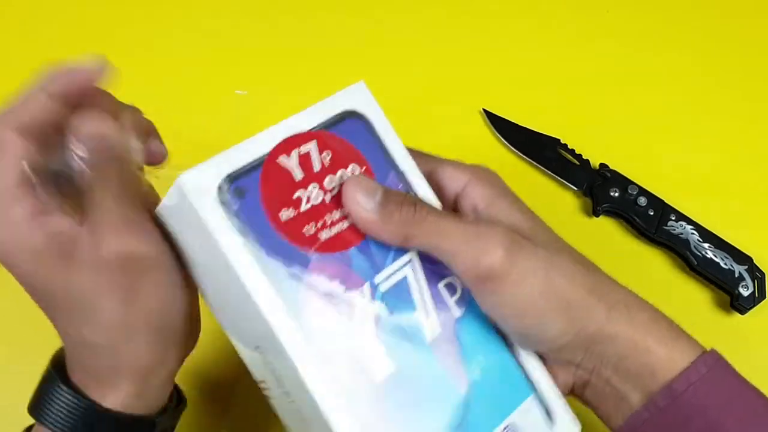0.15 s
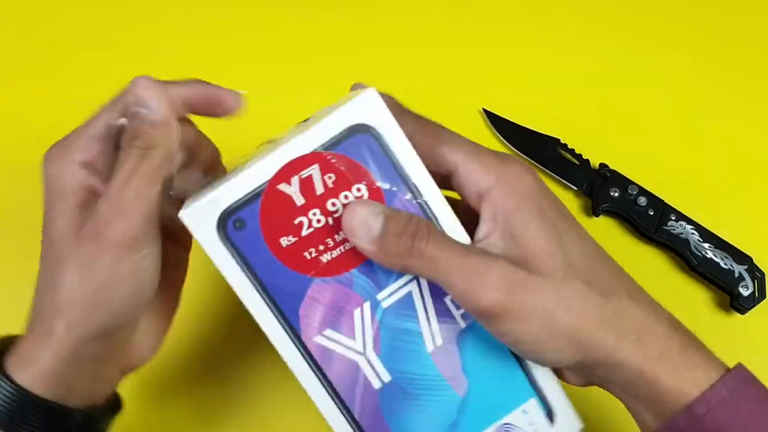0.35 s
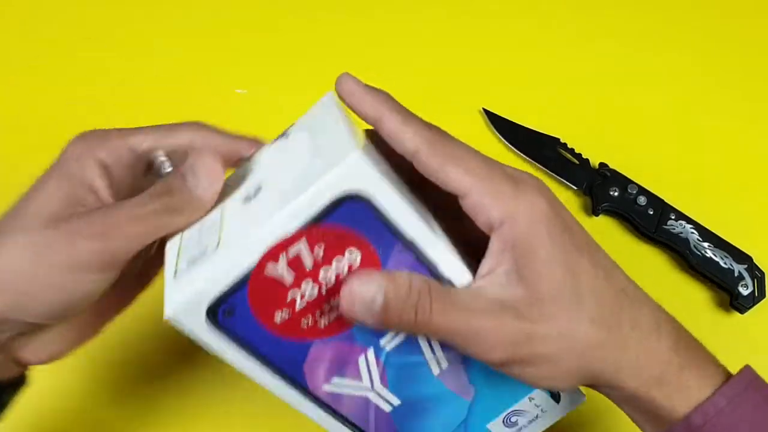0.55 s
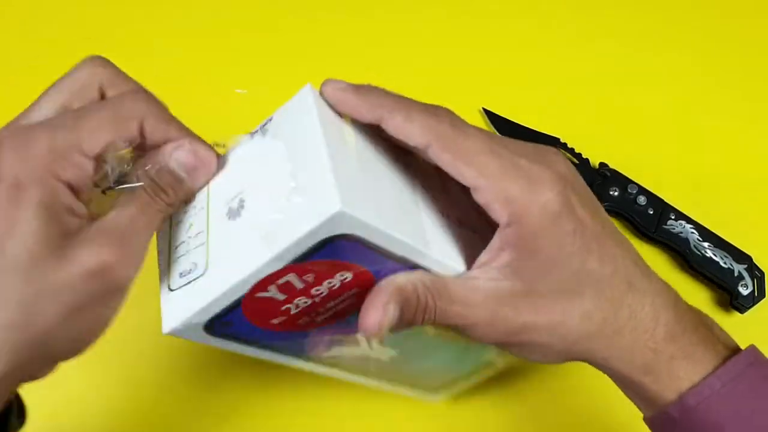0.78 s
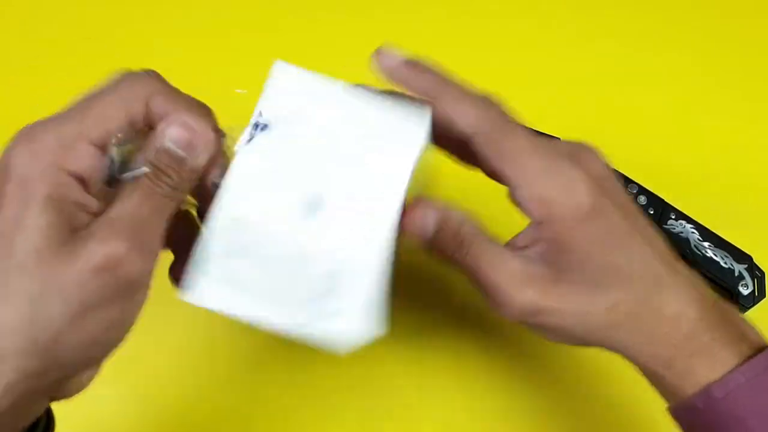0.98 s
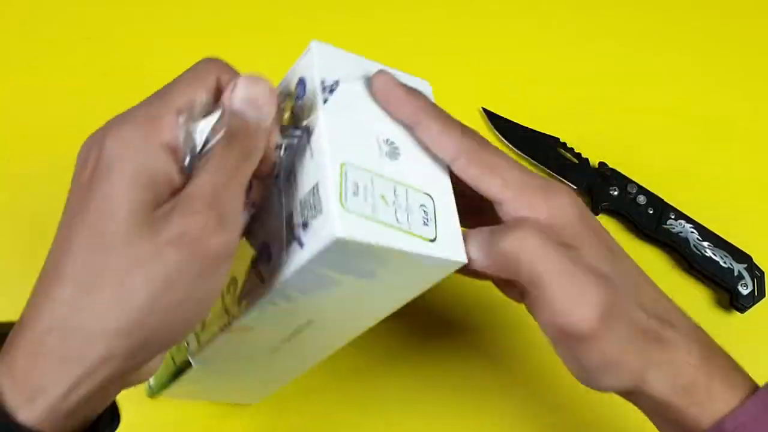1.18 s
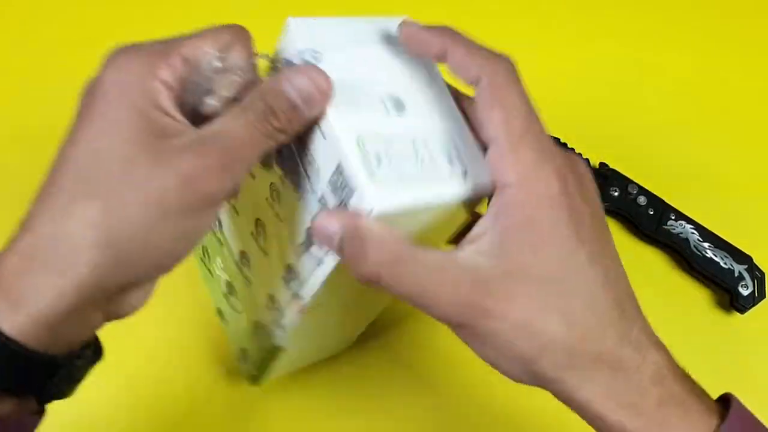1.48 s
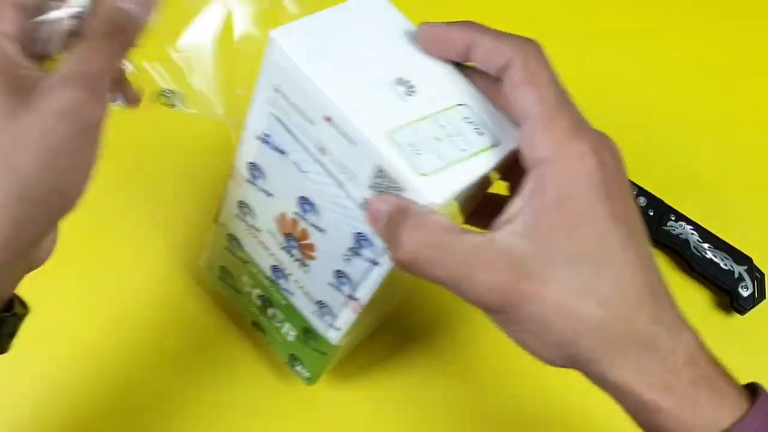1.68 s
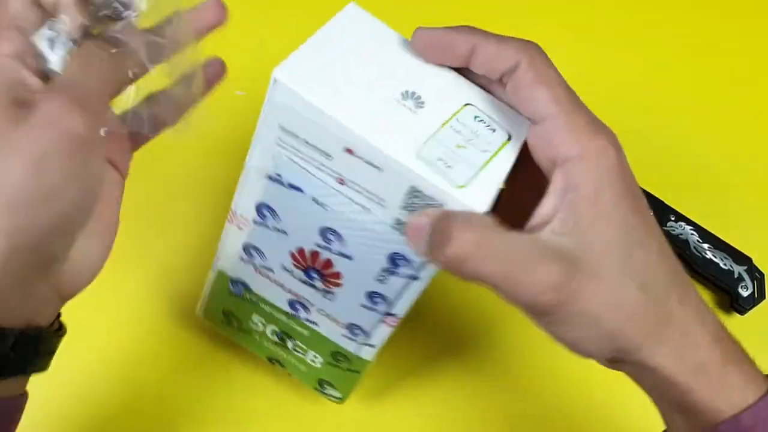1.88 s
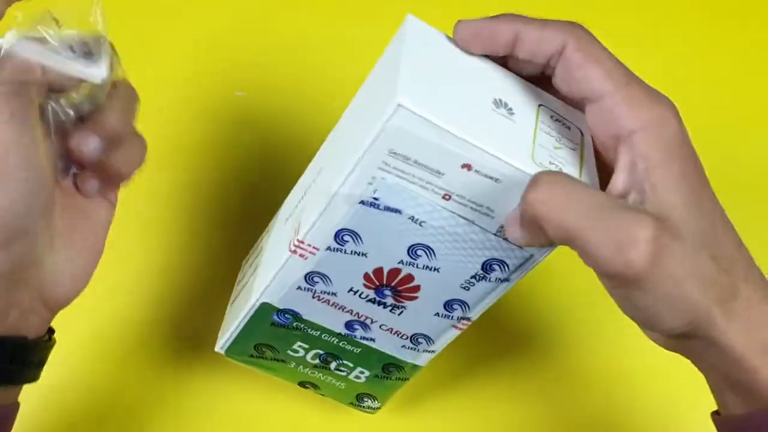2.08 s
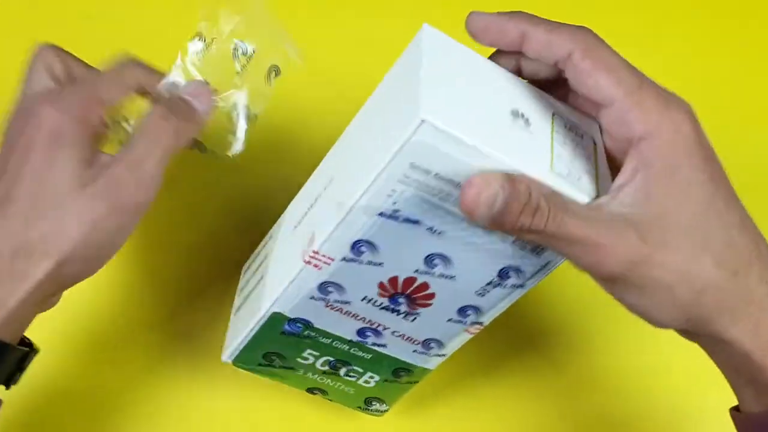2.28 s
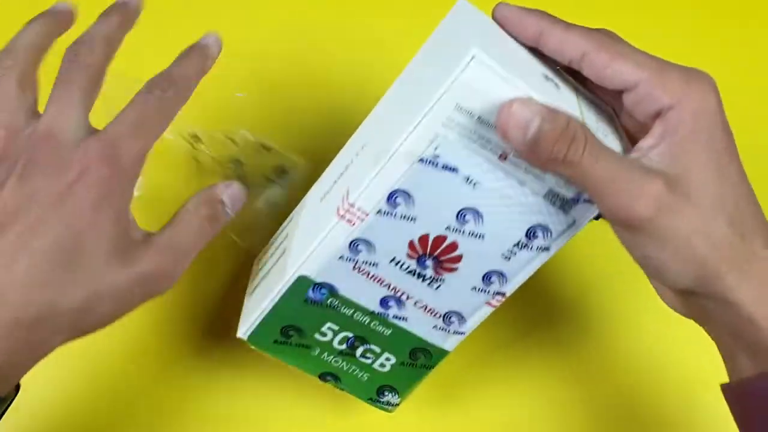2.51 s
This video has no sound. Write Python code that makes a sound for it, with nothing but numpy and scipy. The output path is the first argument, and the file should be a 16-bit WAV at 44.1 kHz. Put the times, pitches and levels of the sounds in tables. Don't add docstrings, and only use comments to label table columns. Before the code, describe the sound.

Thin plastic film crinkles and snaps as hands tear it off a cardboard box indoors

```python
import sys
import numpy as np
from scipy import signal
from scipy.fft import rfft, irfft
from scipy.io import wavfile

SR = 44100
rng = np.random.default_rng(int(sys.argv[2]) if len(sys.argv) > 2 else 0)


def amplitude_ratio(level_db):
    exponent = np.asarray(level_db, float) / 20
    return 10 ** exponent


def wav_record(signal):
    frames = np.transpose(np.atleast_2d(signal))
    bounded = np.clip(frames, -1, 1)
    quanta = np.round(bounded * 32767).astype(np.int16)
    wavfile.write(sys.argv[1], SR, quanta)


N = 116865

# time_s, crackle_db
HANDLING = [(0, -50), (0.173, -71), (.195, -47.5), (.47, -38.5), (.53, -46), (.65, -49), (.93, -40.5),
            (1.06, -44.5), (1.28, -42), (1.5, -45), (1.621, -50.5), (1.69, -31.5), (2.05, -39),
            (2.299, -31), (2.45, -39), (2.65, -46)]
# pitch_hz, level_db (per Hz)
FILM = [(70, -20.5), (300, -7.5), (1000, -14), (1600, -5), (2200, -4), (4300, -1.4), (8000, -1.5),
        (12000, -4.5), (16500, -24)]


def evened(x):
    return x / np.sqrt(np.mean(x ** 2) + 1e-20)


def read(points, hz):
    table_hz, value = np.transpose(points)
    return np.interp(np.log(hz + 1), np.log(table_hz + 1), value)


def add(mix, start_s, sound):
    part = mix[round(start_s * SR):][:len(sound)]
    part += sound[:len(part)]


def causal(points):
    log_gain = np.log(amplitude_ratio(read(points, abs(np.fft.fftfreq(2048, 1 / SR)))))
    return np.fft.ifft(np.exp(np.conj(signal.hilbert(log_gain)))).real[:512]


def band(x, edge_hz, kind):
    return signal.sosfilt(signal.butter(2, edge_hz, kind, fs=SR, output="sos"), x)


def handling_db():
    time_s, level_db = np.transpose(HANDLING)
    return np.interp(np.arange(N) / SR, time_s, level_db)


def air():
    # pitch_hz, level_db (per Hz)
    air_colour = [(30, 5.5), (100, 5.5), (600, 2), (4000, -9), (10000, -19.5), (16500, -35)]
    air_db, rub_share = -50, 0.33
    spectrum = rfft(rng.standard_normal(N)) * amplitude_ratio(read(air_colour, np.fft.rfftfreq(N, 1 / SR)))
    rub_db = rub_share * (handling_db() - np.transpose(HANDLING)[1].mean())
    return amplitude_ratio(air_db + rub_db) * evened(irfft(spectrum, N))


def snap(level_db, hz, treble_db, chance, film):
    splits_per_s, ring_cycles, treble_run_s = 17000, 1.05, .0025
    treble_hz, film_low_hz = 7500, 450
    t = np.arange(chance.shape[1]) / SR
    run_s = .0012 * (.5 + chance[0, 0])
    first = 1.1 * chance[0, 1]
    place = chance[0, 2]

    splits = (chance[0] < splits_per_s / SR) * (2 * chance[1] - 1)
    splits = splits * np.exp(-(t / run_s - .5) ** 2)
    splits = splits + first * (t == 0) * np.sign(chance[1, 0] - .5)

    ringing = np.exp(-t * hz / ring_cycles) * np.sin(2 * np.pi * hz * t)
    ring = band(np.convolve(splits, ringing)[:len(t)], .5 * hz, "high")
    body = band(np.convolve(splits, film)[:len(t)], treble_hz, "low")
    body = band(body, film_low_hz, "high")
    treble = band(splits * np.exp(-t / treble_run_s), treble_hz, "high")
    treble = band(treble, 1.2 * treble_hz, "low")
    mix = amplitude_ratio(-6) * evened(ring) + amplitude_ratio(0.5) * evened(body)
    mix = mix + amplitude_ratio(-0.26 + treble_db) * evened(treble)

    echo_s, echo_db, echo_spread = .00095, -7, .2
    lag = round(echo_s * (1 + echo_spread * (place - .5)) * SR)
    mix = mix + amplitude_ratio(echo_db) * band(np.pad(mix, (lag, 0))[:len(t)], treble_hz, "low")
    return amplitude_ratio(level_db - 1.5) * mix * np.sqrt(.0025 / t[-1])


def crackle():
    crackles_per_s, size_spread_db, crackle_db = 1100, 3, -3
    hit, size, patch = rng.random((N, 3)).T
    size = amplitude_ratio(size_spread_db * np.minimum(-np.log(size + 1e-9), 3))
    size = size * (hit < crackles_per_s / SR)
    pitches = np.geomspace(1200, 8000, 30)
    patch = (patch * len(pitches)).astype(int)
    out, film = np.zeros(N), causal(FILM)
    for k, (hz, chance) in enumerate(zip(pitches, rng.random((len(pitches), 2, 512)))):
        out += signal.oaconvolve(size * (patch == k), snap(0, hz, -5, chance, film))[:N]
    return amplitude_ratio(handling_db() + crackle_db) * evened(out)


def snaps():
    # start_s, level_db, ring_hz, treble_db
    clear_snaps = [(0.0153, -44.5, 5900, -1), (0.057, -35.5, 1510, -2), (0.1363, -34, 8350, -2),
                   (0.19, -35, 4200, 2), (0.1976, -29, 3400, -15), (0.2015, -40, 4500, 5),
                   (0.209, -22.5, 3200, -8), (0.2196, -31, 4500, -10), (0.2234, -29, 2720, 1),
                   (0.2645, -29.5, 2630, -7), (0.2875, -28, 2820, -9), (0.2907, -30, 6500, 0),
                   (0.3049, -31, 2570, 7.5), (0.3098, -27, 4500, -26), (0.3747, -24, 3000, 2.5),
                   (0.3862, -24.5, 5740, -23), (0.4373, -29, 4600, 0.5), (0.4602, -37.5, 8300, 8.5),
                   (0.4731, -31.5, 3550, -4), (0.6423, -38, 3780, -7), (0.6593, -35.5, 6900, -25),
                   (0.6645, -31, 3980, -5), (0.6995, -23.5, 5440, -9), (0.732, -31.5, 3900, -1.5),
                   (0.7589, -25, 3840, -2), (0.76, -27, 4160, -20), (0.829, -28.5, 5700, -1.5),
               (0.849, -28, 4380, -20), (0.8582, -31, 5800, -2), (0.884, -31.5, 3380, -27),
               (0.9013, -24, 6500, -20), (0.941, -27.5, 3960, 1), (0.9524, -20, 4040, -40),
               (1.005, -21.5, 2970, -15), (1.0243, -17.5, 5830, -4), (1.0254, -20, 2560, 3.5),
               (1.0299, -21.5, 3200, -22), (1.0351, -14.5, 4840, -2), (1.0448, -22, 7540, -9),
               (1.0586, -15, 3500, 2.5), (1.0755, -29, 3000, -16), (1.089, -22.5, 2490, -26),
               (1.1427, -28, 3370, 0), (1.148, -30.5, 4200, -34), (1.1741, -33.5, 4200, -30),
               (1.1878, -26, 2420, -23), (1.191, -34.5, 2140, -4), (1.1953, -29, 7950, -10),
                   (1.2449, -29.5, 4260, -8), (1.311, -22.5, 2400, -4), (1.3198, -27.5, 4220, -2),
               (1.3427, -20, 4230, -2), (1.3672, -24.5, 4670, 0.5), (1.3899, -32, 5680, -24),
               (1.401, -27.5, 6560, -41), (1.4064, -34, 2500, -12), (1.4324, -25.5, 4570, -20),
               (1.47, -20.5, 4800, -5), (1.4839, -21.5, 1940, -7), (1.496, -34, 6000, -13),
               (1.502, -24, 3960, -3), (1.544, -24.5, 5380, 0.5), (1.548, -28.5, 3800, -2),
               (1.571, -46, 2870, -1), (1.5898, -33, 4370, -11), (1.6416, -22, 3140, -2.5),
               (1.667, -20, 2020, 2.5), (1.6931, -18.5, 4270, 0), (1.6989, -22.5, 2300, -11),
               (1.7029, -20, 2440, 6), (1.7094, -12.5, 2670, -4), (1.7338, -17, 4020, -6),
                   (1.7647, -26.5, 2240, 1), (1.784, -14.5, 4630, -5), (1.8228, -11.5, 2400, -6),
                 (1.841, -27, 4050, 3), (1.845, -22, 2060, -22), (1.8491, -21.5, 7700, -30),
                 (1.8705, -23, 6000, -1), (1.9147, -23, 2340, -2.5), (1.9398, -20.5, 3830, 2),
                 (1.9678, -22, 3880, -13), (2.0343, -27, 4970, -10), (2.085, -23, 3700, -7),
                 (2.134, -30, 3370, -13), (2.1356, -22, 3400, -9), (2.1396, -22.5, 3660, -15),
                 (2.1456, -20, 3780, -5), (2.2, -22.5, 8750, 5), (2.2027, -25, 4640, -21),
                 (2.2952, -22, 4430, 3.5), (2.3082, -28.5, 4560, 3), (2.3208, -24, 4460, -31),
                 (2.3879, -30, 4050, -4), (2.3953, -29, 5770, -6), (2.4012, -28, 2020, -14)]
    # start_s, level_db
    rustles = [(.184, -46), (.37, -34), (1.679, -24.5), (1.685, -30), (1.748, -27), (2.273, -37),
               (2.2876, -32), (2.327, -22), (2.486, -35), (2.511, -34), (2.524, -29), (2.568, -41)]
    # start_s, level_db, ring_hz
    ticks = [(0.0435, -44.5, 2500), (.0829, -46.5, 3620), (0.1595, -42, 1590), (.2347, -36.5, 4470),
             (.2487, -33, 2270), (0.276, -36.5, 2260), (0.3012, -29.5, 2400), (.5707, -43, 3400),
             (0.6057, -46, 2330), (0.6124, -37, 2280), (0.625, -43, 3230), (.6336, -44, 5990),
             (0.675, -42, 3790), (0.7315, -37, 4400), (.8117, -48, 2150), (.8238, -36, 3700),
             (0.8353, -37, 1830), (.9271, -36.5, 4570), (0.9667, -36, 3660), (1.105, -33, 2120),
             (1.1248, -39, 2200), (1.2208, -39, 4560), (1.226, -34, 1360), (1.2953, -33, 1480),
             (1.3355, -32, 3330), (1.3538, -32.5, 6290), (1.3575, -39, 6290), (1.372, -29.5, 4130),
             (1.382, -37, 6000), (1.455, -34, 3160), (1.4876, -38, 4120), (1.5231, -33, 3320),
             (1.5273, -26.5, 3170), (1.5654, -35.5, 4350), (1.5699, -38, 3120), (1.604, -37, 3130),
             (1.6134, -34, 3230), (1.629, -39, 2370), (1.853, -23.5, 3640), (1.8632, -33, 2970),
             (1.8759, -26, 3570), (1.9244, -33, 3170), (1.958, -26, 5100), (1.977, -30, 3550),
             (2.0388, -50, 5220), (2.0514, -39, 4780), (2.06, -36, 3850), (2.0702, -31, 2850),
             (2.0988, -36, 4400), (2.1096, -30, 2930), (2.1421, -25.5, 4900), (2.2104, -28.5, 5120),
             (2.3757, -36, 4130), (2.4466, -42, 1730), (2.4796, -33.5, 7050), (2.5365, -48, 3880),
             (2.6465, -46, 7620)]
    rows = clear_snaps
    rows += [(start_s, level_db, 3600, -10) for start_s, level_db in rustles]
    rows += [(start_s, level_db, hz, -10) for start_s, level_db, hz in ticks]
    out, film = np.zeros(N), causal(FILM)
    for row, chance in zip(rows, rng.random((len(rows), 2, 512))):
        start_s, level_db, hz, treble_db = row
        add(out, start_s, snap(level_db, hz, treble_db, chance, film))
    return out


def thuds():
    # start_s, level_db, pitch_hz
    blows = [(.184, -30, 298), (.51, -36.5, 208), (0.54, -19.5, 72), (.545, -32.5, 422), (0.578, -28, 170),
             (.64, -33, 85.6), (1.024, -23, 222), (1.026, -20.5, 351), (1.085, -28.5, 570),
             (1.128, -33, 112), (1.185, -30.5, 316), (1.287, -33.5, 196), (1.441, -26.5, 88),
             (1.482, -31, 570), (1.54, -33, 90), (1.61, -32, 192), (1.702, -23.5, 534), (1.731, -16.5, 354),
             (1.782, -19, 558), (1.8, -32, 48), (2.029, -41, 60)]
    rise_cycles, puff_db = .8, -11
    out, t = np.zeros(N), np.arange(SR // 4) / SR
    for (start_s, level_db, hz), puff in zip(blows, rng.standard_normal((len(blows), len(t)))):
        puff = band(band(puff, 1.34 * hz, "low"), .5 * hz, "high")
        tone = np.sin(2 * np.pi * hz * t) + amplitude_ratio(puff_db) * evened(puff)
        t60_s = .012 + 5 / hz
        rise = np.minimum(t * hz / rise_cycles, 1)
        add(out, start_s, amplitude_ratio(level_db - 60 * t / t60_s) * rise * tone)
    return out


def tail(near):
    # pitch_hz, t60_s
    room_decay = [(100, 0.71), (1500, 0.88), (6000, 0.54), (15000, 0.37)]
    hz, t, z = signal.stft(rng.standard_normal(SR), SR, nperseg=256)
    z = z * amplitude_ratio(-60 * t / read(room_decay, hz)[:, None])
    out = signal.istft(z, SR, nperseg=256)[1]
    t = np.arange(len(out)) / SR
    rise = np.clip(t / 0.0023 - .5, 0, 1)
    out = out * rise * (1 + near * np.exp(-t / 0.0062))
    return out / np.linalg.norm(out)


def room_notes(x):
    # pitch_hz, level_db, t60_s
    low_notes = [(80.4, -28, .6), (168.7, -22.5, 0.75), (222, -19.5, 0.89)]
    t, answer = np.arange(SR) / SR, np.zeros(SR)
    for hz, level_db, t60_s in low_notes:
        ring = amplitude_ratio(-60 * t / t60_s) * np.sin(2 * np.pi * hz * t)
        answer += amplitude_ratio(level_db) * ring / np.linalg.norm(ring)
    return signal.fftconvolve(x, answer)[:N]


def scene():
    film_room_db, near_db, box_room_db, turn_rad_per_s = -9, 10, -10, 23
    film, box = snaps() + crackle(), thuds()
    turn = np.arange(N) / SR * turn_rad_per_s
    wet = np.zeros(N)
    for k in range(3):
        share = np.cos(turn - k * 2 * np.pi / 3)
        wet += amplitude_ratio(film_room_db) * signal.fftconvolve(film * share, tail(amplitude_ratio(near_db)))[:N]
        wet += amplitude_ratio(box_room_db) * signal.fftconvolve(box * share, tail(0))[:N]
    return (film + box + wet + room_notes(box) + air())[None]


def low_pass(x):
    return signal.sosfilt(signal.butter(12, 16810, fs=SR, output="sos"), x)


def record(dry):
    low_cut_hz, edge_hz, limit = 38, 15780, 1.1
    mix = band(band(dry, low_cut_hz, "high"), low_cut_hz, "high")
    mix = limit * np.tanh(mix / limit)
    edge = signal.firwin(255, edge_hz, window=("kaiser", 7), fs=SR)[None]
    return low_pass(signal.oaconvolve(mix, edge, "same"))


dry = scene()
out = record(dry)
wav_record(out)
```